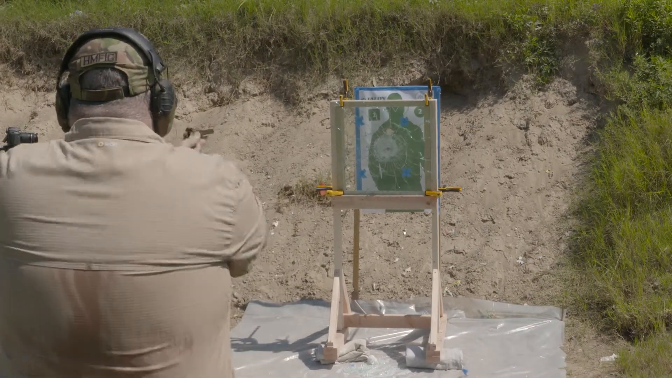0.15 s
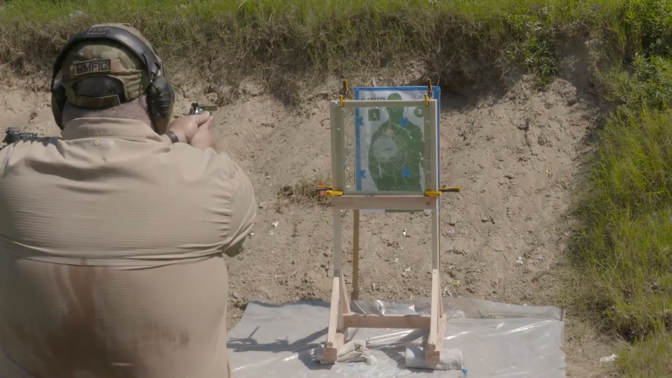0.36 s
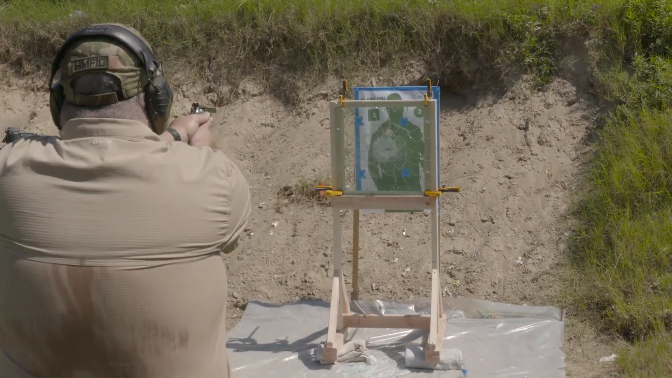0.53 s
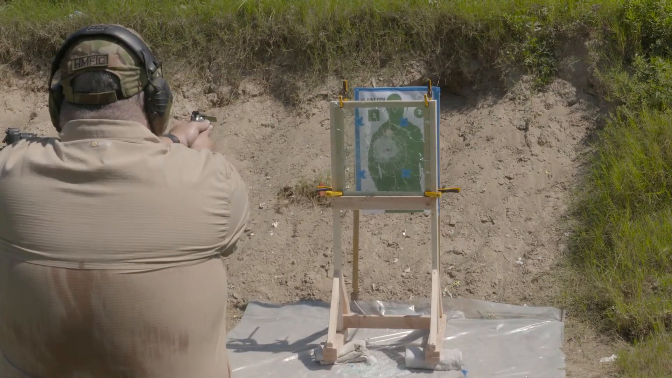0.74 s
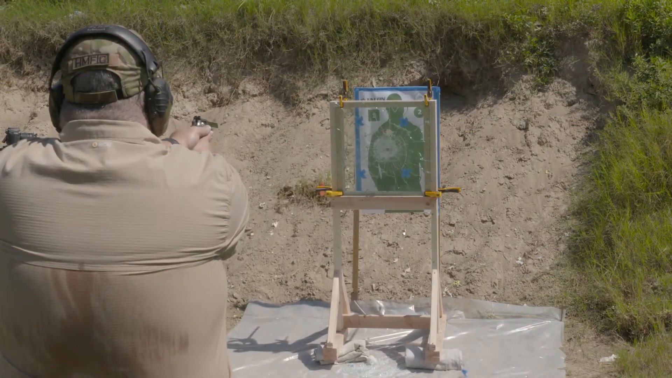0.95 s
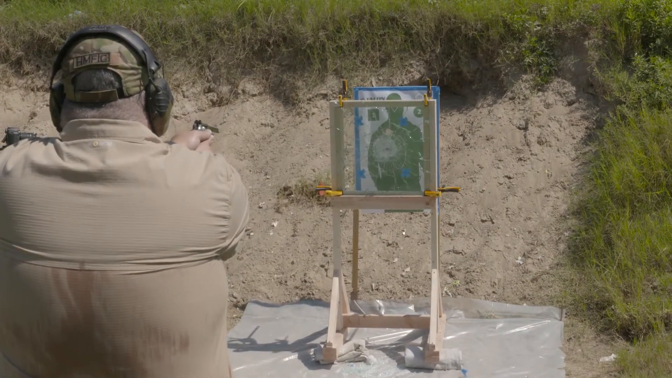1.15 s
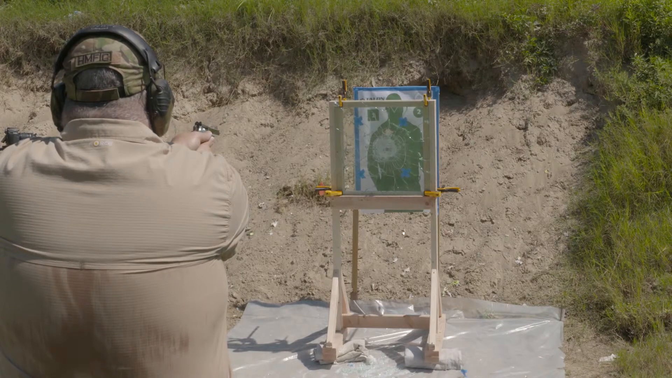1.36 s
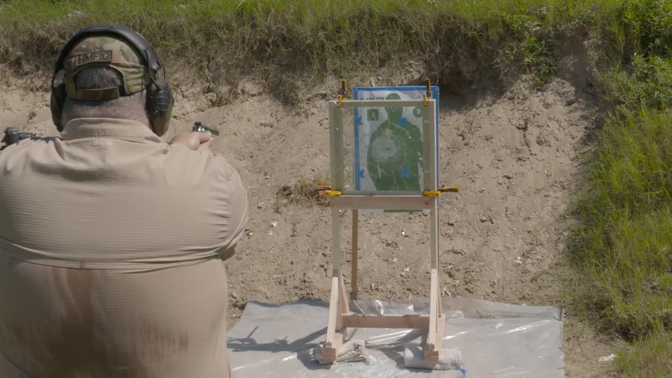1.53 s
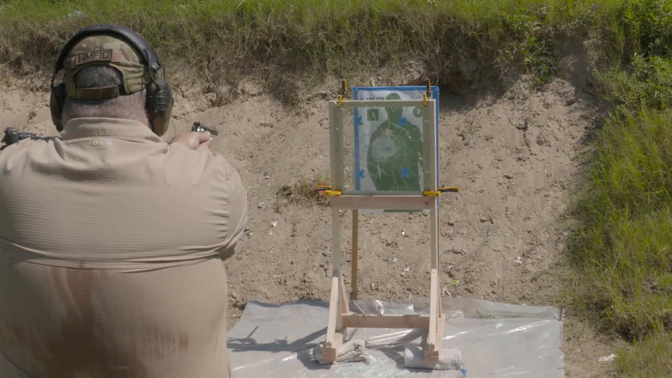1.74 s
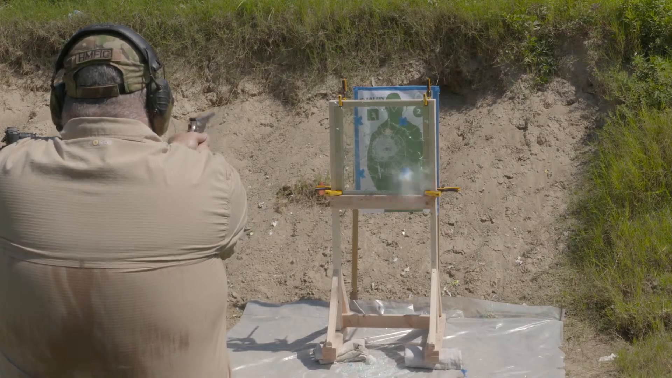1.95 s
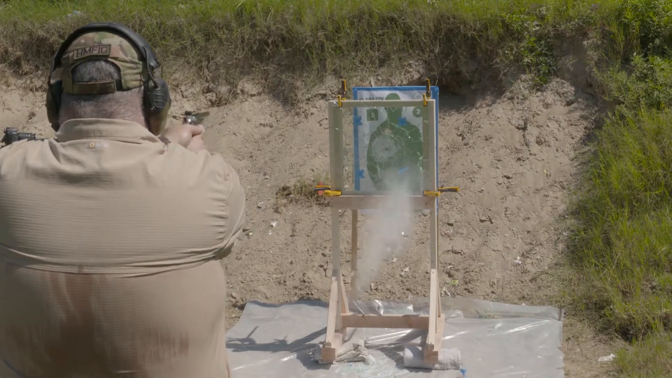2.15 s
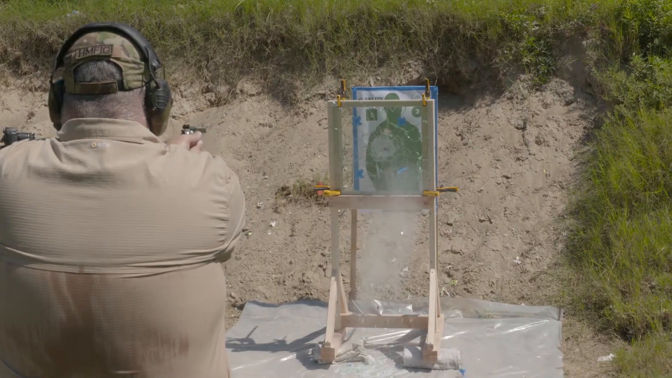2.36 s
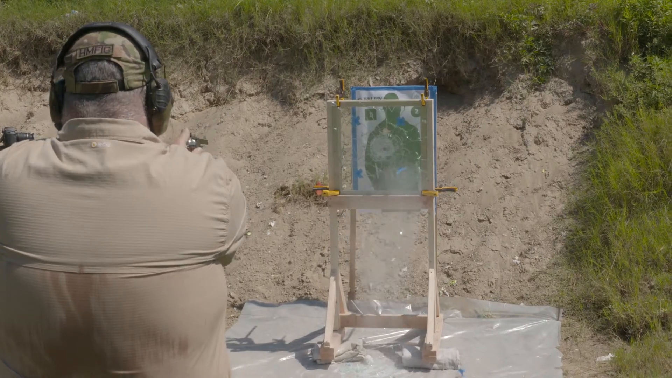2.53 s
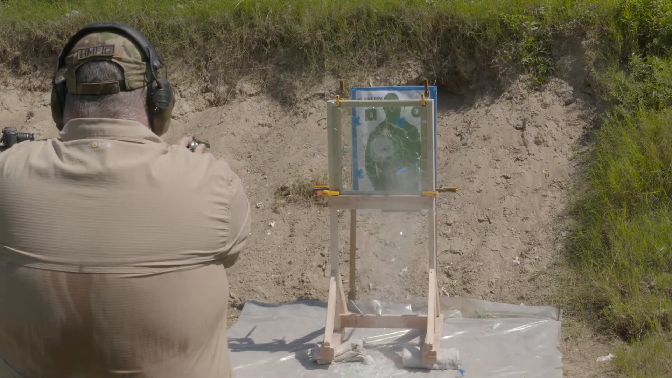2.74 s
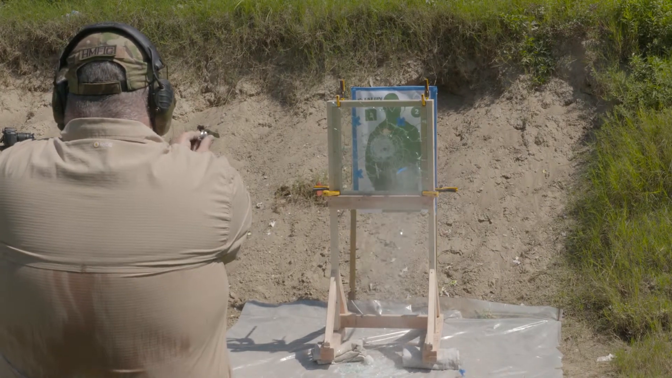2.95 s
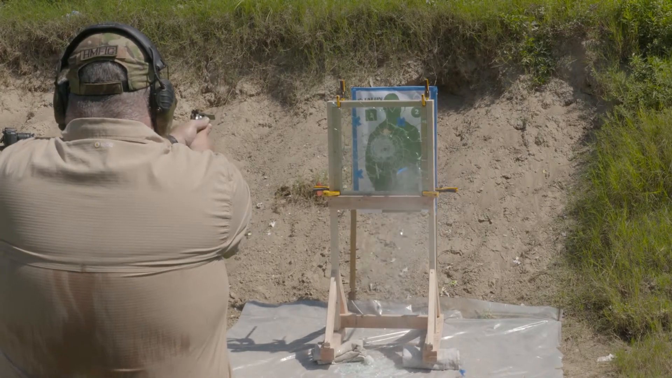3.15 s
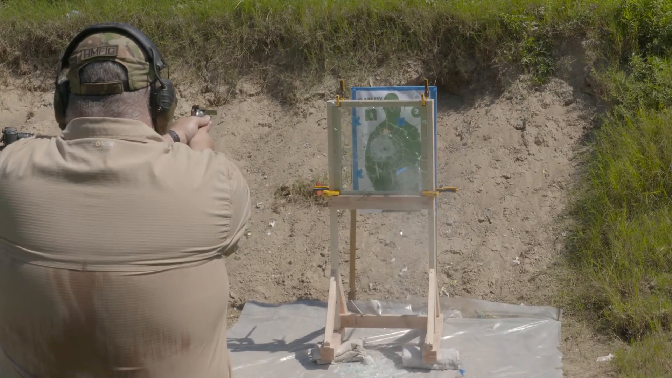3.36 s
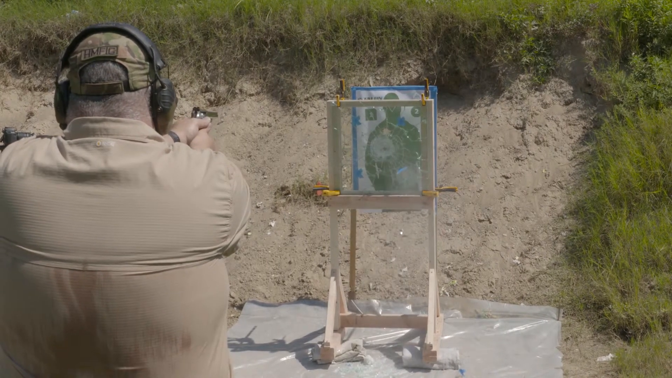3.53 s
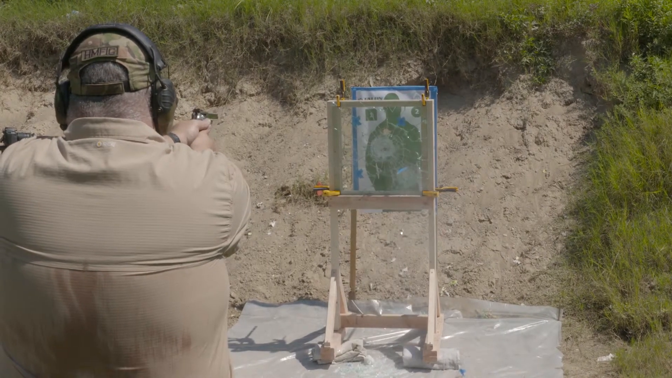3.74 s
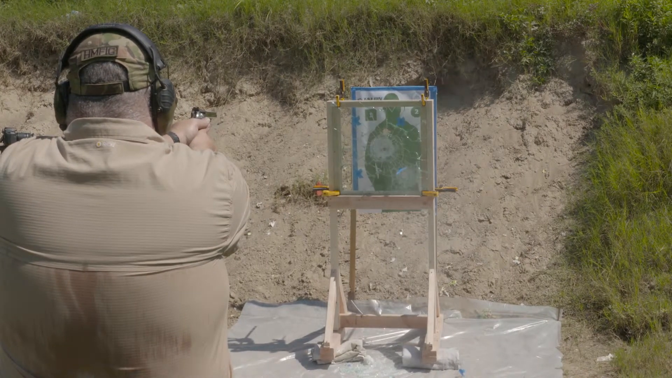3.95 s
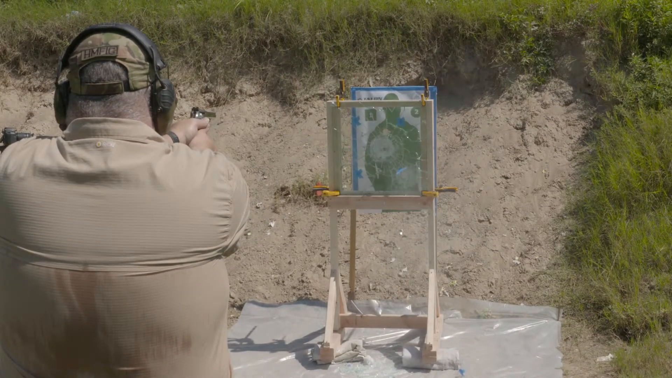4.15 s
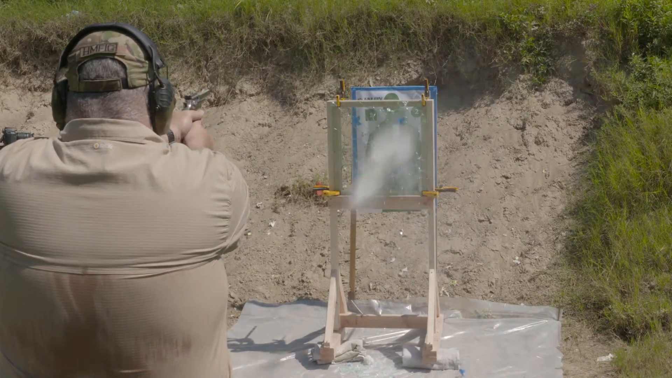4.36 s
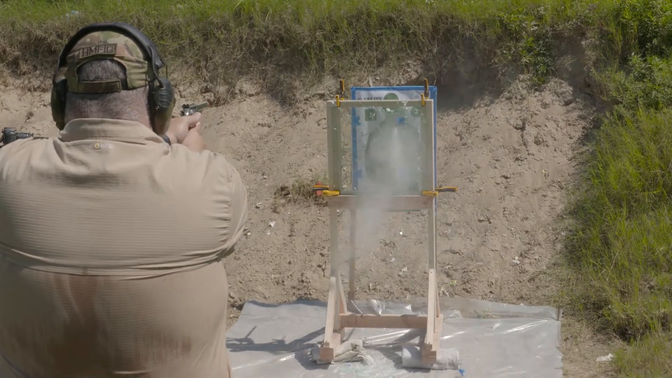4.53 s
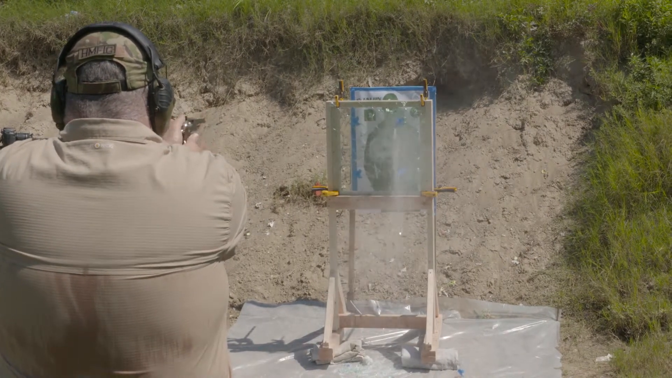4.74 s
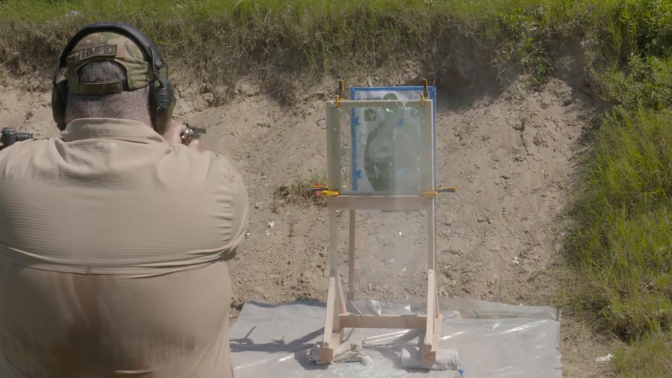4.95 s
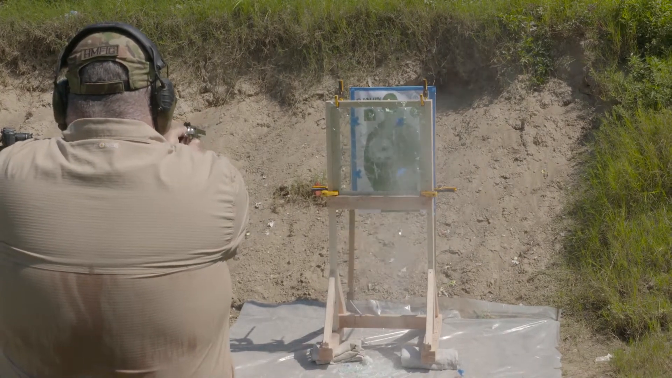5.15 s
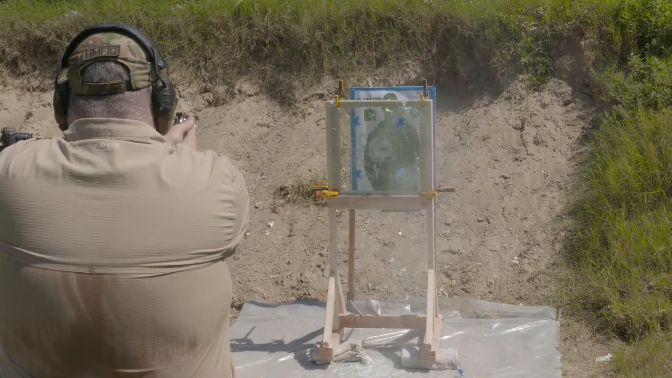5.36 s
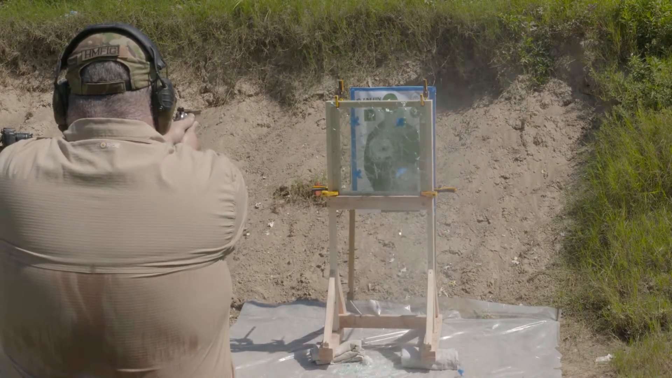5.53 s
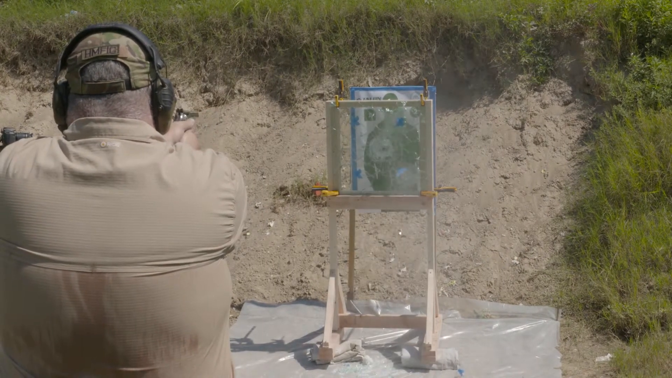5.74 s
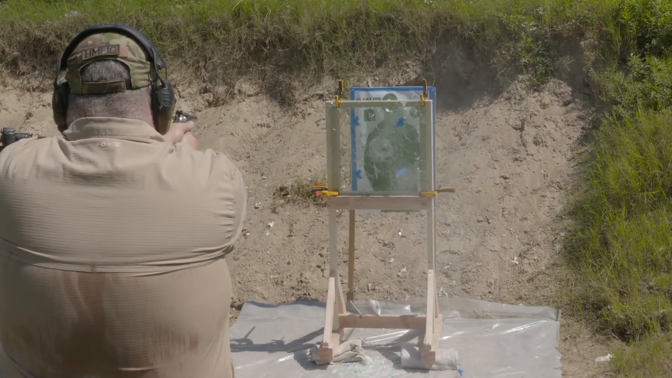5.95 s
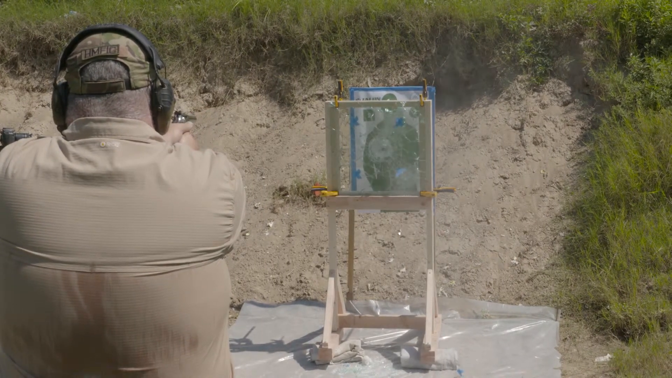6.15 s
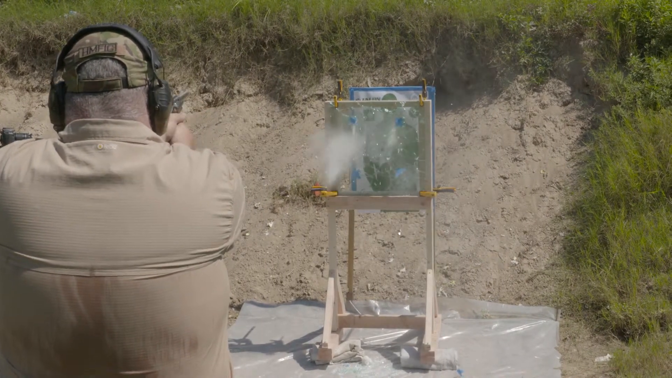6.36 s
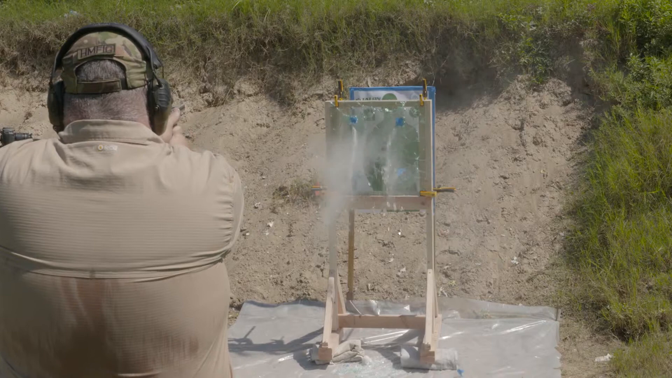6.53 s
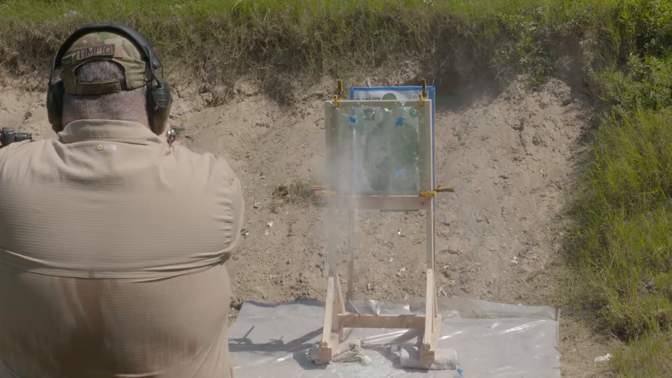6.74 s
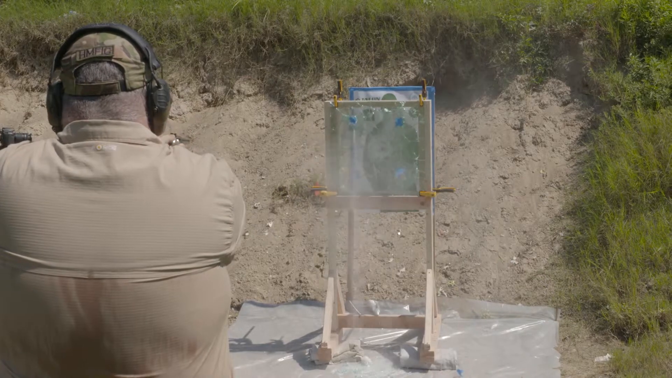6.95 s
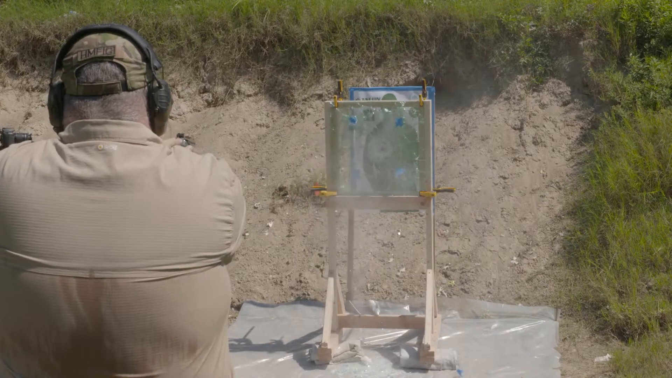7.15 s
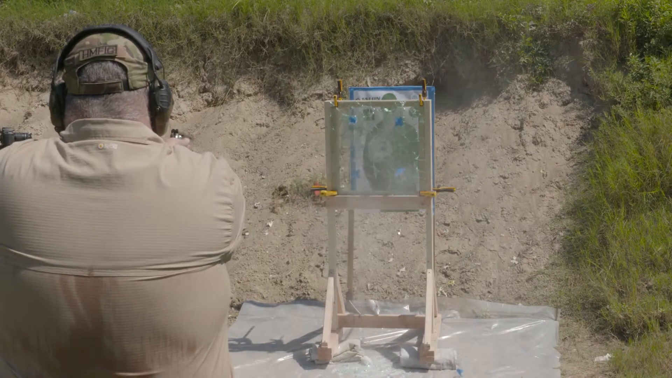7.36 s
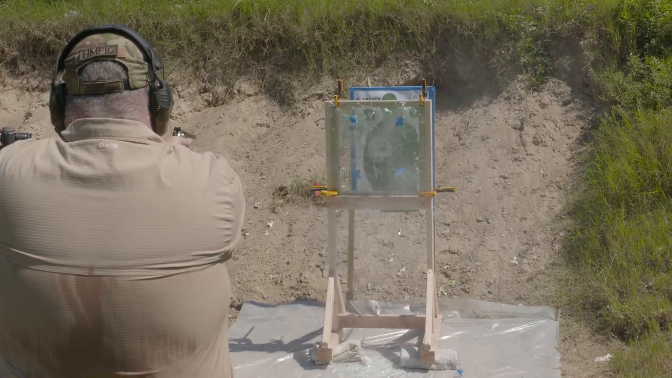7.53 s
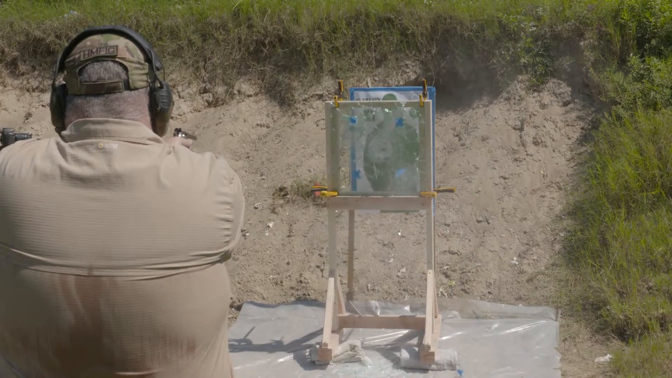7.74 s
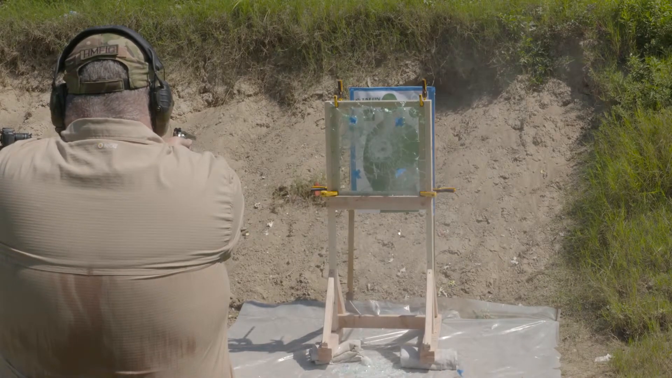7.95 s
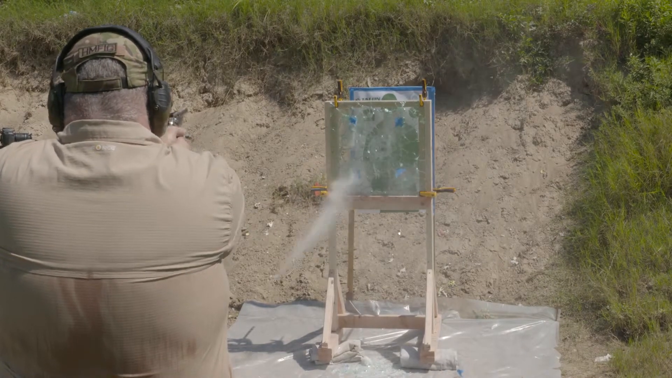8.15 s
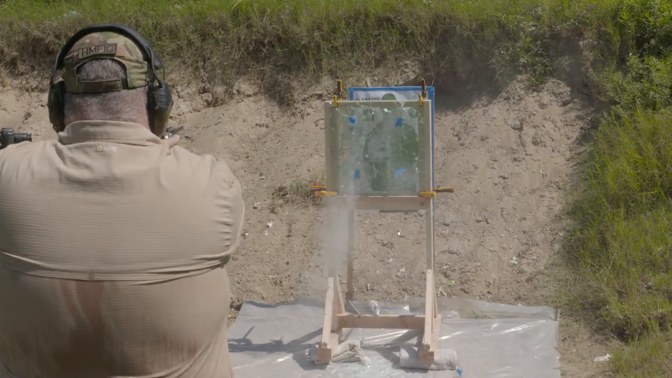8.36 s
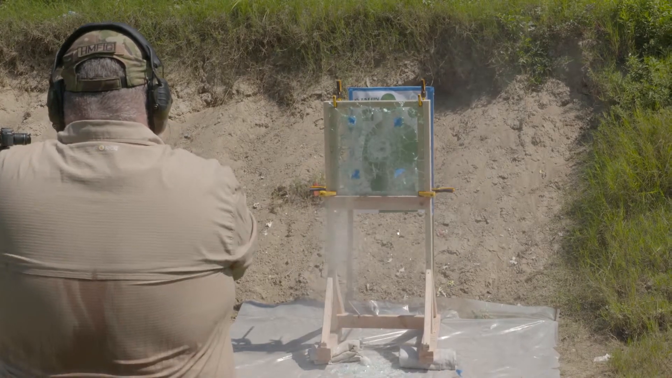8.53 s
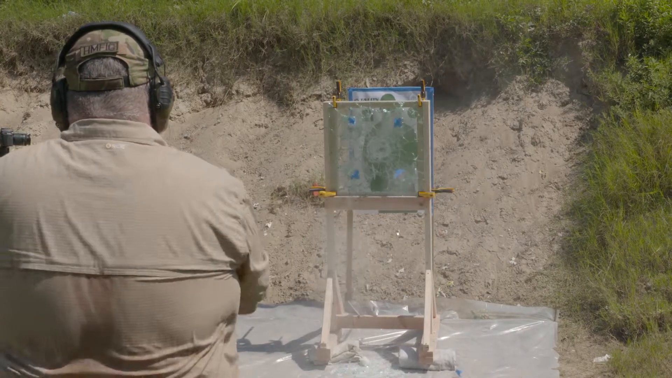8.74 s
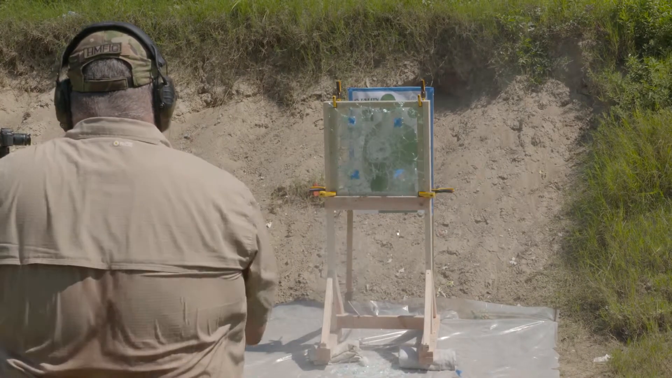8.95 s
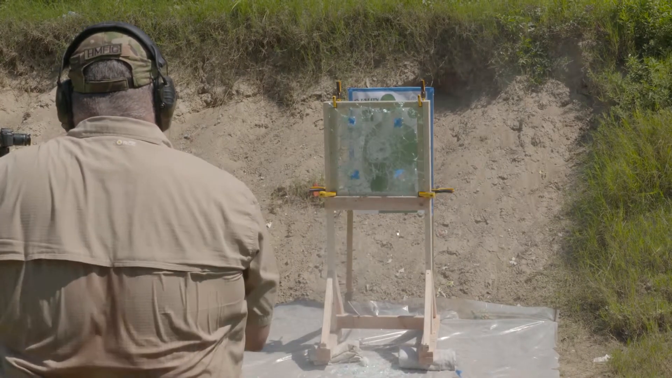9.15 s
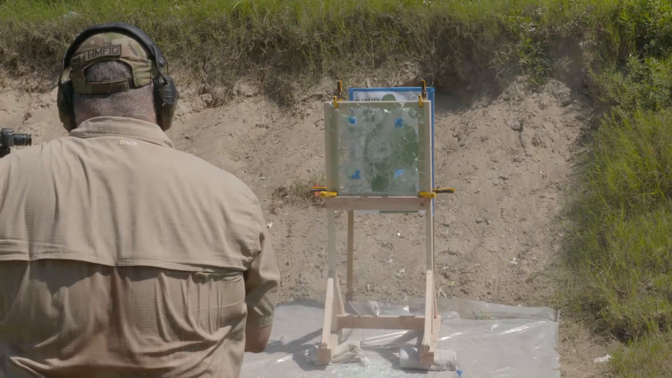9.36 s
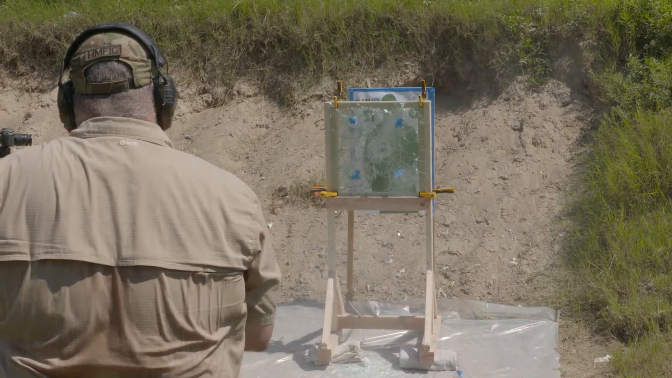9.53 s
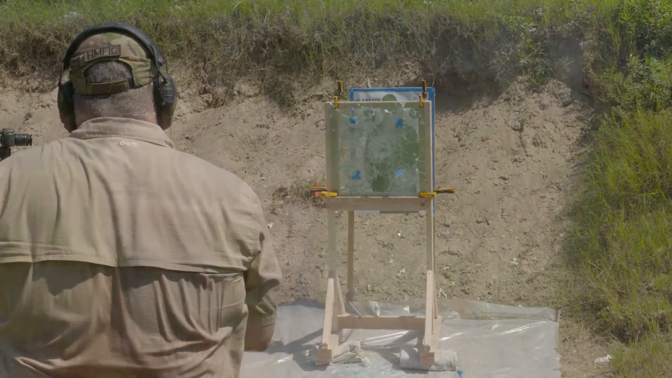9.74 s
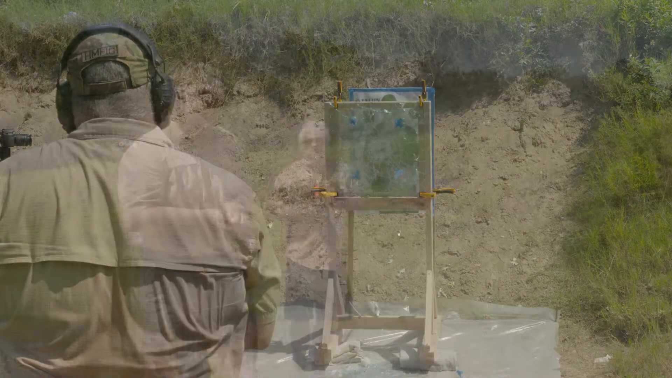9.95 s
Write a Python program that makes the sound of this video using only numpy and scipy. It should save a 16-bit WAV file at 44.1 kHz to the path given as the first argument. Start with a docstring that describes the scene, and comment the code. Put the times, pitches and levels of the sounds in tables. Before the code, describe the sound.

Soft wind and distant insects sound over an outdoor range, dropping abruptly at about 1.8 seconds. A pistol close to the microphone fires four times, at about 2.0, 4.2, 6.2 and 8.0 seconds. Each shot is a very loud, sharp crack with a brief thump that overloads the microphone. It slaps back at once from the ground and earth bank, then a softer echo rolls from distant trees for about a second. Roughly half a second after each shot, kicked-up dirt patters down in a faint sandy hiss, with small ticking clods and bouncing chips. A faint, low engine hum far away swells from about 5 seconds, peaks near the third shot and recedes. The wind and insects stay very quiet beneath the shooting, rising slightly with a soft gust just before the end at 10 seconds.

```python
"""Soft wind and insects in the grass on an outdoor range; both drop abruptly just before the first shot.
Four pistol shots overload the nearby microphone. Each blast slaps back from the ground, target stand
and earth berm, then rolls back from distant trees. Dirt thrown up by the bullets patters down, with
ticking clods and bouncing chips. Far off, an engine hum swells around the third shot."""
import sys
import numpy as np
from scipy import signal
from scipy.fft import rfft, irfft, next_fast_len
from scipy.io import wavfile
from scipy.ndimage import map_coordinates

SR = 44100
rng = np.random.default_rng(int(sys.argv[2]) if len(sys.argv) > 2 else 0)


def put_to_file(sound):
    """Save the sound as 16-bit audio at rate SR, in the file named by the first command-line argument."""
    columns = np.atleast_2d(sound).T  # one column per channel
    safe = np.clip(columns, -1, 1)
    whole_steps = np.round(safe * 32767)
    wavfile.write(sys.argv[1], SR, whole_steps.astype(np.int16))


N = 441000
TIME = np.arange(N) / SR
AGE = np.arange(round(1.6 * SR)) / SR  # seconds since a shot or an impact


def amp(db):
    """Decibels to gain."""
    return 10 ** (np.asarray(db) / 20)


def unit(x):
    """Scale to rms 1."""
    return x / np.sqrt(np.mean(x ** 2) + 1e-20)


def filtered(x, response):
    """x shaped by a gain that depends on frequency."""
    size = next_fast_len(len(x) + 8192)
    return irfft(rfft(x, size) * response(np.fft.rfftfreq(size, 1 / SR)), size)[:len(x)]


def coloured(x, spectrum):
    """x shaped by a (Hz, dB) spectrum, at rms 1."""
    knots_hz, db = np.transpose(spectrum)
    return unit(filtered(x, lambda hz: amp(np.interp(np.log(hz + 1), np.log(knots_hz), db))))


def band(centre_hz, width_hz, size):
    """Noise in one resonance, at rms 1."""
    noise = rng.standard_normal(size)
    return unit(filtered(noise, lambda hz: 1 / (1 + ((hz - centre_hz) / width_hz) ** 2)))


def wobble(rate, size):
    """A smooth random curve, rate knots a second."""
    knots = rng.standard_normal(int(size * rate / SR) + 4)
    return map_coordinates(knots, [np.arange(size) * rate / SR])


def phase(hz):
    """Running phase of a moving frequency."""
    return 2 * np.pi * np.cumsum(hz) / SR


def add(track, s, sound):
    """Mix a sound into the track at s seconds."""
    part = track[max(0, round(s * SR)):][:len(sound)]
    part += sound[:len(part)]


def swell(t, full_s, rise, hold_s, fall):
    """A gain that rises to 1 at full_s, holds and falls away; rise and fall are in dB a second."""
    return amp(-rise * np.maximum(full_s - t, 0) - fall * np.maximum(t - full_s - hold_s, 0))


def background(db, early_db, end_swell):
    """Gain of a background layer: it drops by early_db to db, eases off slowly and swells at the end."""
    drop_s, return_s = 1.823, 9.726
    easing_db = 0.42 * (TIME - drop_s)
    late_db = end_swell * 34 * np.maximum(TIME - return_s, 0)
    return amp(db + early_db * (TIME < drop_s) - easing_db + late_db)


# Wind over the open range. Each row: frequency in Hz, spectral level in dB.
WIND_SPECTRUM = [(12, -31.5), (20, 0), (54, 0), (103, -4.5), (135, -11), (197, -5.5), (361, -9.5),
                 (484, -9), (853, -15), (2010, -31.5), (3000, -34), (3900, -60), (6600, -120)]
# Gusts right on the microphone. Each row: peak time in seconds, level in dB, half-width in seconds.
GUSTS = [(.05, -45.5, .25), (3.276, -54.5, .07), (3.556, -52, 0.055), (9.93, -48, .08)]

def wind():
    """Soft outdoor rush, with gusts that buffet the microphone."""
    rush = coloured(rng.standard_normal(N), WIND_SPECTRUM) * amp(0.39 * wobble(10, N))
    rumble = unit(band(37, 64, N) * amp(3.3 * wobble(13, N)))
    gusts = sum(amp(db) * np.exp(-((TIME - s) / width) ** 2) for s, db, width in GUSTS)
    buffet = background(-65, early_db=7, end_swell=1.3) + gusts
    return background(-53, early_db=13, end_swell=1.2) * rush + buffet * rumble


# Insects some way off in the grass. Each row: frequency in Hz, spectral level in dB.
CHORUS_SPECTRUM = [(1500, -23.5), (2500, -10.5), (3600, -3.5), (4300, -3.5), (5300, 0), (6700, -0.5),
                   (7300, -8), (8800, -17), (11000, -24.5), (16000, -26.5)]

def insects():
    """A distant chorus, a cricket's pulsed chirps and a high buzzing katydid."""
    def beat(hz):
        return (1 + np.sin(phase(hz * (1 + 0.036 * wobble(4.3, N))))) / 2

    chorus = coloured(rng.standard_normal(N), CHORUS_SPECTRUM) * amp(0.44 * wobble(25, N))
    cricket = amp(-4) * band(4250, 70, N) * beat(22) ** 2 * beat(2.6)
    buzz = amp(-9.5) * band(10400, 200, N) * beat(72)
    rasp = amp(-8.5) * band(9850, 300, N) * (.45 + .65 * beat(4.1))
    return background(-66.5, early_db=14, end_swell=.8) * (chorus + cricket + buzz + rasp)


# The clods and clicks that stand out at the microphone.
# Each row: start in seconds, relative level in dB, pitch in Hz, time to fade 60 dB in seconds.
TICKS = [(0.027, -35, 8060, .026), (.191, -40, 3000, 0.013), (2.8945, -30.5, 3670, .06),
         (3.349, -45, 3500, .033), (3.7996, -36.5, 4120, 0.013), (3.9006, -45, 2600, .023),
         (4.739, -29.5, 4500, .035), (4.805, -32, 10800, .026), (5.0865, -31, 3520, 0.053),
         (5.3868, -32.5, 5500, .042), (5.4296, -33, 2720, .037), (5.597, -35.5, 2610, .034),
         (5.8876, -44, 3020, .03), (6.8238, -26, 4970, .077), (7.057, -29.5, 1720, 0.14),
         (7.062, -29.5, 760, .15), (8.416, -41, 7460, 0.021), (8.4635, -43, 7900, .02),
         (8.6984, -32, 6000, 0.028), (9.015, -39, 4000, 0.025)]

def ticks():
    """Small dry contacts: a short broad click on a quickly damped resonance."""
    out, t = np.zeros(N), AGE[:SR // 4]
    for s, db, hz, t60 in TICKS:
        body = band(hz, 0.29 * hz, len(t)) * amp(-60 * t / t60)
        click = amp(-1.5) * band(1.3 * hz, 1.3 * hz, len(t)) * amp(-60 * t / 0.016)
        add(out, s, amp(db - 11) * (body + click))
    return out


# The pistol, close to the microphone. Each row: start in seconds, blast gain in dB, crack pitch in Hz,
# side bank gain in dB, tree echo gain in dB, microphone swing in Hz, swing level in dB.
SHOTS = [(1.9677, -1, 2564, -1.5, -0.5, 13.3, -11), (4.2362, -.5, 5960, -0.5, -0.5, 10.6, -12.5),
         (6.233, -1, 3020, 0.5, -1, 10, -10.5), (8.003, -0.5, 3914, 2.5, -1.5, 16, -3.5)]

def pistol():
    """Every shot with its near and far echoes, all over the same terrain."""
    out, terrain = np.zeros(N), rng.standard_normal(len(AGE))
    for s, db, crack_hz, bank_db, trees_db, swing_hz, swing_db in SHOTS:
        blast = muzzle() + target_stand() + near_echoes(terrain) + grazing_echo()
        echoes = amp(bank_db) * bank_echo() + amp(trees_db) * tree_echo()
        add(out, s, amp(db) * blast + echoes + microphone_swing(swing_hz, swing_db))
        add(out, s, amp(db) * crack_edge(crack_hz))
    return out


# The muzzle crack at close range. Each row: frequency in Hz, spectral level in dB.
CRACK_SPECTRUM = [(100, -12.5), (600, 6), (1500, 4), (3000, -3), (6000, -6.5), (10000, -12.5), (16000, -22)]

def muzzle():
    """Turbulent gas cracks over a low thump and a pressure jump that ends in shallow suction."""
    gas = coloured(rng.standard_normal(len(AGE)), CRACK_SPECTRUM)
    crack = amp(13.5) * gas * np.exp(-(AGE / 0.0019) ** 2)
    thump = -amp(3.5) * np.sin(2 * np.pi * 208 * AGE) * np.exp(-(AGE / 0.0067) ** 2)
    jump_s, push_s = 0.002, 0.021
    progress = np.maximum(AGE - jump_s, 0) / push_s
    shock = amp(-3.5) * (AGE >= jump_s) * (1 - progress) * np.exp(-progress)
    return crack + thump + shock


def crack_edge(hz):
    """Each crack is brightest around its own pitch, which dies away with the near echoes."""
    t = AGE[:SR // 4]
    return band(hz, 350, len(t)) * amp(-13.5 - 60 * t / 0.14)


def microphone_swing(hz, db):
    """The overloaded microphone swings back to rest within a cycle or so."""
    return -amp(db) * np.sin(2 * np.pi * hz * AGE) * np.exp(-(AGE * hz / .95) ** 2)


# Surfaces near the firing point.
# Each row: delay in seconds, slap level in dB, slap pitch in Hz, reflected crack level in dB.
SURFACES = [(.0045, -0.5, 444.8, -7.5), (0.0161, -6, 1320, -3.5), (0.024, 7.5, 520.3, -1.5),
            (0.0282, 0.5, 680, -8), (.031, -0.5, 800, -16), (0.0337, -2, 480, -23),
            (0.0436, 0.5, 394.4, -17.5), (.053, -0.5, 520, -21), (0.061, -2.5, 570, -15.5),
            (0.0659, 0.5, 625, -14.5), (0.071, -2, 390.6, -18.5)]

def near_echoes(terrain):
    """Near surfaces throw back the blast as slaps, short cracks and rough scatter."""
    slaps = sum(amp(db + rng.normal(0, 1)) * slap(delay, hz) for delay, db, hz, _ in SURFACES)
    bursts = sum(amp(db) * np.exp(-((AGE - delay - .001) / 0.0018) ** 2) for delay, _, _, db in SURFACES)
    cracks = bursts * coloured(rng.standard_normal(len(AGE)), CRACK_SPECTRUM)
    return slaps + cracks + scatter(terrain)


def slap(delay, hz):
    """A broad surface returns the blast as a couple of fading cycles."""
    cycles = np.maximum(AGE - delay, 0) * hz
    return np.sin(2 * np.pi * cycles) * np.exp(-cycles / 0.96)


# Scatter off the rough ground and berm. Each row: frequency in Hz, spectral level in dB.
SCATTER_SPECTRUM = [(30, -13), (90, -7), (210, -10.5), (320, -1.5), (430, 0.5), (530, 2.5), (660, -1.5),
                    (800, -2.5), (1050, -2.5), (1450, -9), (2000, -11.5), (3200, -15.5), (7000, -17),
                    (10000, -23.5), (16000, -32)]

def scatter(terrain):
    """The berm scatters steadily while the blast crosses it, and every slap drags a short trail."""
    def shared(hz):  # the lows repeat from shot to shot; the fine detail changes
        return np.cos(.3) / (1 + (hz / 2600) ** 2)

    fresh = filtered(rng.standard_normal(len(AGE)), lambda hz: np.sqrt(1 - shared(hz) ** 2))
    noise = coloured(filtered(terrain, shared) + fresh, SCATTER_SPECTRUM)
    berm = amp(-14.5) * swell(AGE, full_s=0, rise=0, hold_s=0.066, fall=339.5)
    trails = [(AGE >= delay) * amp(db - 15 - 60 * np.abs(AGE - delay) / 0.041)
              for delay, db, _, _ in SURFACES]
    return noise * np.linalg.norm([berm, *trails], axis=0)


# Modes of the target stand downrange.
# Each row: frequency in Hz, level in dB, time to fade 60 dB in seconds.
STAND_MODES = [(565, -16.5, 0.024), (884, -20, 0.099), (1283, -11, 0.059), (2460, -16, .035)]

def target_stand():
    """The wooden stand rings briefly as the blast passes."""
    t = np.maximum(AGE - .0115, 0)
    return sum(amp(db + rng.normal(0, 4.4) - 60 * t / t60) * np.sin(2 * np.pi * hz * t)
               for hz, db, t60 in STAND_MODES)


def grazing_echo():
    """Evenly spaced surfaces answer at ever wider intervals: a short, rough, falling note."""
    full_s, focus_s = .102, .164
    hz = 1000 * np.maximum(AGE / full_s, .5) ** -1.03
    focus_db = 9 * np.exp(-((AGE - focus_s) / .009) ** 2)  # one surface stands out
    ripple_db = 2.5 * np.cos(2 * np.pi * (AGE - focus_s) / .021)  # the others ripple the note
    level = amp(-32 + ripple_db + focus_db) * swell(AGE, full_s, rise=499, hold_s=0, fall=189.5)
    turn = phase(hz * (1 + 0.032 * wobble(300, len(AGE))))
    # slight unevenness in the spacing smears the note
    smear = wobble(260, len(AGE)) * np.cos(turn) + wobble(260, len(AGE)) * np.sin(turn)
    return level * (np.sin(turn) + .5 * smear)


# The bank off to one side. Each row: frequency in Hz, spectral level in dB.
BANK_SPECTRUM = [(100, -5.5), (500, 1.5), (850, -9), (2000, -6), (6000, -11), (9000, -17.5), (16000, -30)]
# Its resonances. Each row: centre in Hz, width in Hz, level in dB.
BANK_RESONANCES = [(1328.4, 160, -8), (2830, 300, -12.5), (4500, 500, -15)]

def bank_echo():
    """The side bank gives a short, hollow answer a fifth of a second after the shot."""
    hollow = sum(amp(db) * band(hz, width, len(AGE)) for hz, width, db in BANK_RESONANCES)
    wash = coloured(rng.standard_normal(len(AGE)), BANK_SPECTRUM)
    level = amp(-45.5) * swell(AGE, full_s=0.19, rise=332.5, hold_s=0.095, fall=294)
    return (wash + hollow) * level


# The roll from the distant trees. Each row: frequency in Hz, spectral level in dB.
TREE_SPECTRUM = [(100, -15.5), (280, 2.5), (600, 1.5), (950, -4.5), (1600, -5.5), (3000, -13.5),
                 (6000, -18), (10000, -34.5), (16000, -42.5)]

def tree_echo():
    """Countless trunks and leaves return a grainy roll."""
    grains = rng.standard_normal(len(AGE)) * amp(1.4 * wobble(500, len(AGE)))
    level = swell(AGE, full_s=0.49, rise=107.5, hold_s=0.1, fall=39)
    return coloured(grains, TREE_SPECTRUM) * level * amp(-42 + .49 * wobble(4, len(AGE)))


# Dirt raining back downrange after each bullet.
# Each row: time it is thickest in seconds, level in dB, rise and nominal fall in dB a second.
SHOWERS = [(2.45, -45.5, 111.5, 48), (4.821, -47.5, 48, 23), (6.831, -47.5, 65.5, 35.5),
           (8.52, -52.5, 37.5, 29)]
# Falling sand as it reaches the microphone. Each row: frequency in Hz, spectral level in dB.
SAND_SPECTRUM = [(500, -6.5), (1500, -7.5), (3000, 1), (5500, -2.5), (8000, -5.5), (11500, -15),
                 (14000, -12), (16000, -15.5)]

def dirt():
    """Sand patters down in a hiss of many small impacts; coarser grit trickles on for longer."""
    def showers(linger):
        return sum(amp(db) * swell(TIME, s, rise, hold_s=0.1, fall=fall / linger)
                   for s, db, rise, fall in SHOWERS)

    sand = coloured(impacts(per_s=440, spread_db=5) + 1.4 * rng.standard_normal(N), SAND_SPECTRUM)
    t = AGE[:SR // 10]
    crumble = rng.standard_normal(len(t)) * amp(-60 * t / .015)
    crumbs = signal.fftconvolve(impacts(per_s=32, spread_db=2), crumble)[:N]
    grit = amp(-8) * coloured(crumbs, SAND_SPECTRUM)
    return showers(linger=0.95) * sand + showers(linger=1.4) * grit


def impacts(per_s, spread_db):
    """Grains landing at random: impulses of uneven size, at rms 1."""
    sizes = amp(spread_db * np.minimum(rng.exponential(size=N), 4)) * rng.choice([-1, 1], N)
    return unit(sizes * (rng.random(N) < per_s / SR))


# Hard chips in the falling dirt. Each row: start in seconds, relative level in dB, ring pitch in Hz.
CHIPS = [(2.162, -45.5, 14900), (2.479, -43, 15700), (2.567, -39, 15400), (4.915, -37, 14000),
         (5.031, -42, 13700), (6.849, -30, 13400), (7.0, -45, 13800), (7.147, -52, 15100),
         (8.594, -41, 14030), (8.755, -40, 13800), (9.016, -49, 13800)]

def chips():
    """Hard chips bouncing: a tiny click and two very high modes."""
    out, t = np.zeros(N), AGE[:SR // 4]
    for s, db, hz in CHIPS:
        ring = band(hz, 200, len(t)) + amp(-11) * band(0.58 * hz, 150, len(t))
        click = amp(9) * band(0.66 * hz, 3500, len(t)) * amp(-60 * t / 0.015)
        add(out, s, amp(db - 15.5) * (click + ring * amp(-60 * t / 0.096)))
    return out


# An engine far from the microphone.
# Each row: time in seconds, shaft speed in Hz, firing tone level in dB, upper tones' level in dB.
ENGINE_RUN = [(4, 31.5, -67.5, -71.5), (5.1, 30.8, -63.5, -57.5), (5.5, 30.74, -55, -51),
              (6.1, 30.18, -50.5, -60), (7, 30, -56.5, -69.5), (7.7, 29.58, -65, -69.5),
              (9.3, 29.8, -57.5, -72), (10, 28.5, -54, -68)]
# Its upper tones. Each row: multiple of the shaft speed, level offset in dB.
ENGINE_ORDERS = [(5, 1), (8, -4.5)]

def engine():
    """Only the low orders of the engine carry this far: its firing tone and two upper ones."""
    times, *columns = np.transpose(ENGINE_RUN)
    shaft_hz, firing_db, upper_db = (np.interp(TIME, times, column) for column in columns)
    turn = phase(shaft_hz * (1 + 0.0063 * wobble(1.5, N)))

    def tone(order, db):
        return amp(db + .83 * wobble(3.2, N)) * np.sin(order * turn)

    return tone(order=3, db=firing_db) + sum(tone(order, upper_db + db) for order, db in ENGINE_ORDERS)


def scene():
    """The whole range from one microphone near the pistol."""
    return (pistol() + dirt() + chips() + ticks() + insects() + wind() + engine())[None]


def record(dry):
    """The microphone input clips at full scale, and the treble ends steeply at 16 kHz."""
    clipped = dry / (1 + np.abs(dry) ** 8) ** (1 / 8)
    lowpass = signal.ellip(10, .2, 70, 16000, fs=SR, output="sos")
    return signal.sosfilt(lowpass, clipped)


dry = scene()
out = record(dry)
put_to_file(out)
```